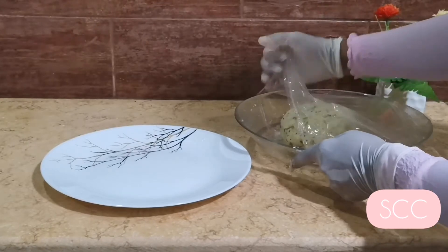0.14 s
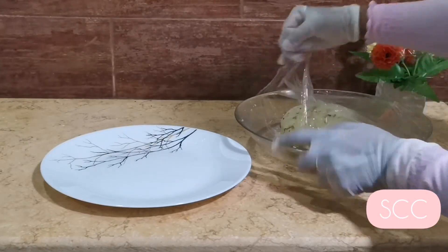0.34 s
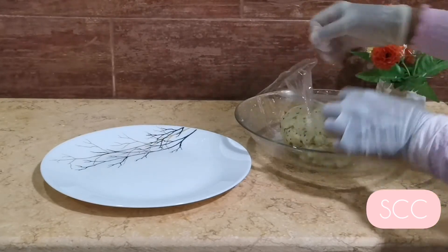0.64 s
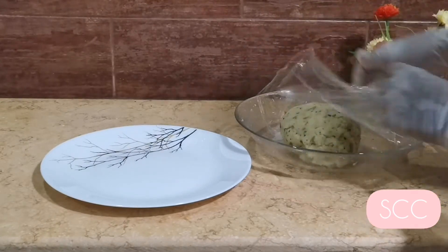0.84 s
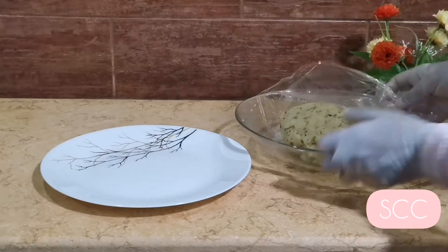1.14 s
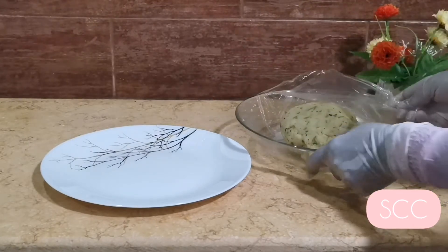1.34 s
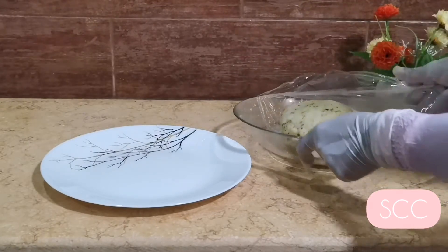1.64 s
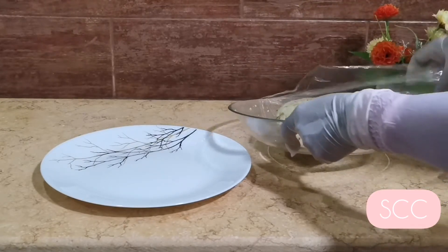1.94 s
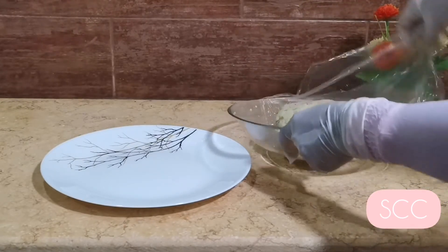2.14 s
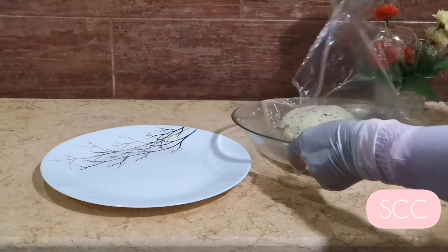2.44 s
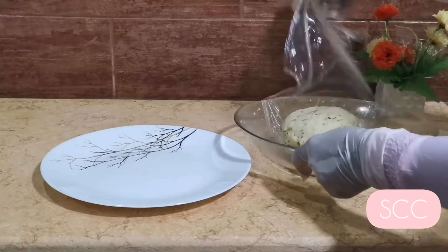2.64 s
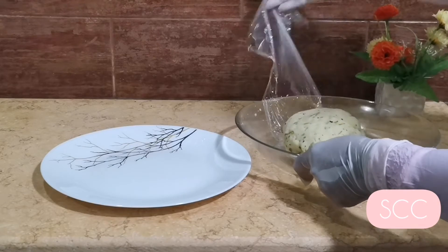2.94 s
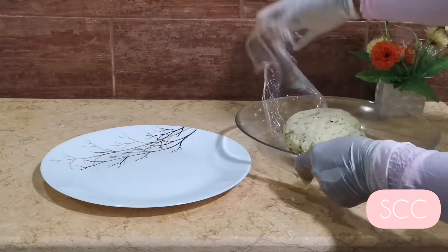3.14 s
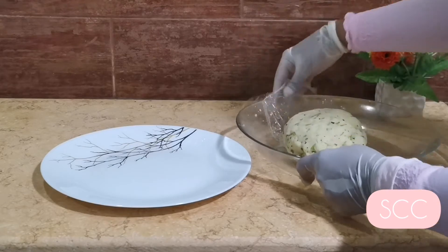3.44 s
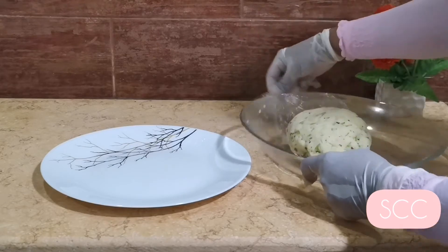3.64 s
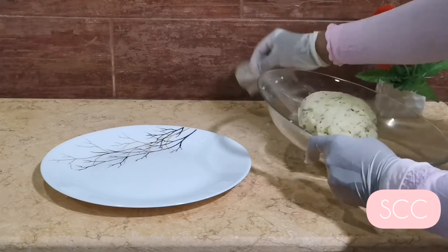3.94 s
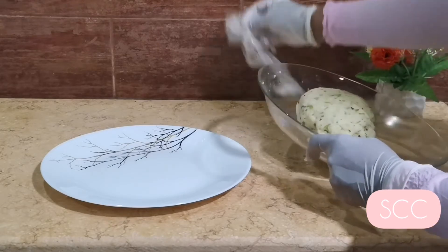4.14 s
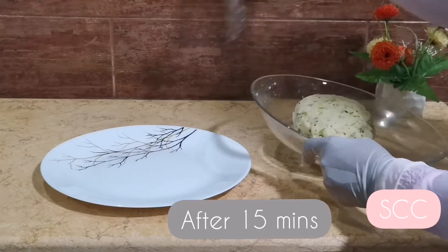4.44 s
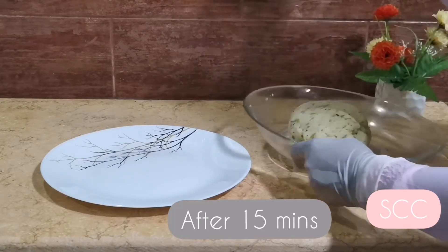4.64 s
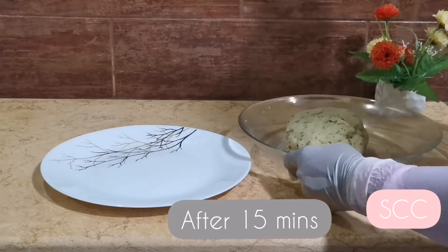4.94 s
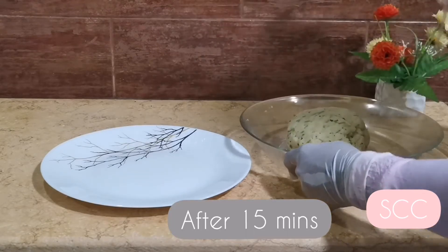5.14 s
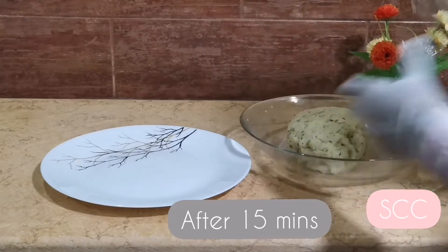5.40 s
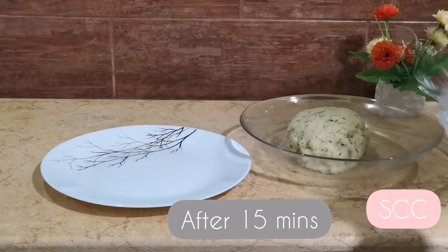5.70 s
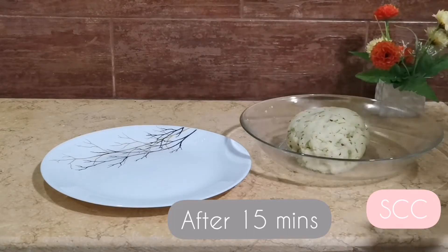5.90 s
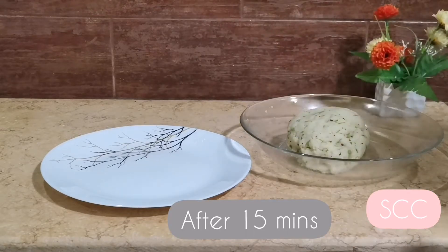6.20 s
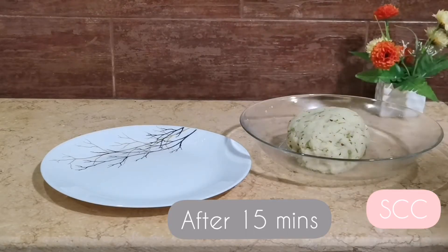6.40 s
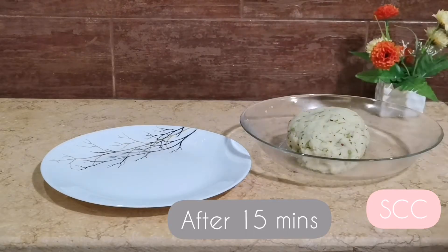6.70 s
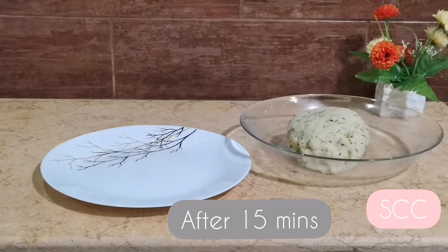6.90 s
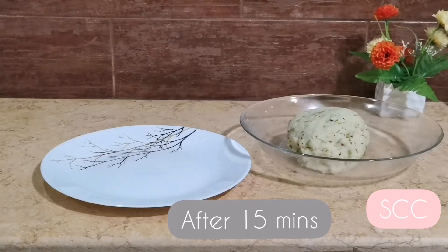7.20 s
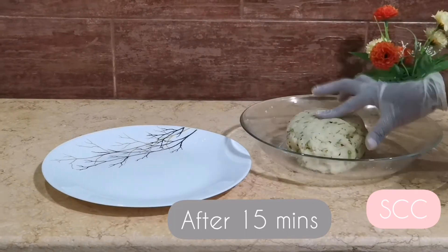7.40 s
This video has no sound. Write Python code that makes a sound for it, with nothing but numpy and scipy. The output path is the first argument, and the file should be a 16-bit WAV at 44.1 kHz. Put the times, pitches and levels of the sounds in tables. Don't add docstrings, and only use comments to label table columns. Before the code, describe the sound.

Gloved hands peel cling film from a glass bowl in a bare, echoing kitchen. Soft crinkles come in swells, with a dull glass knock early and a much louder clunk amid snaps before three seconds. The film is crumpled, the bowl slides briefly on stone and settles, then crinkles continue to one very sharp snap near the end. Close phone microphone, bright treble, faint hiss and hum.

```python
import sys
import numpy as np
from scipy import signal
from scipy.fft import rfft, irfft, next_fast_len
from scipy.io import wavfile
from scipy.ndimage import uniform_filter1d

SR = 44100
rng = np.random.default_rng(int(sys.argv[2]) if len(sys.argv) > 2 else 0)


def unload_wav(signal):
    wavfile.write(
        sys.argv[1],
        SR,
        np.round(np.clip(np.atleast_2d(signal).T, -1, 1) * 32767).astype(np.int16),
    )


def amplitude_ratio(level_db):
    exponent = np.asarray(level_db, float) / 20
    return 10 ** exponent


N = 333275

# peak_s, creases_db, rise_s, fall_s, rub_re_creases_db
FILM_SWELLS = [(.03, -65, 0.2874, 0.968, -5), (.125, -63, 0.02367, 0.1302, -3),
               (0.317, -57.5, 0.05885, 0.0985, -4.5), (0.598, -67, 0.0379, 0.00697, -3.5),
               (.702, -85, 0.031, 0.1604, -20.5), (.954, -59.5, 0.09743, 0.14294, -9.5),
               (1.084, -70, 0.01513, 0.0475, -4), (1.19, -70, 0.02126, 0.1046, 1.5),
               (1.285, -75.5, 0.1174, 0.04094, 7), (1.39, -83, .02, 0.2015, -13),
               (1.487, -60.5, 0.01206, 0.12536, 0.5), (1.629, -60.5, 0.25144, 0.0835, -7),
               (1.814, -65.5, 0.02486, 0.1486, 0), (1.948, -54, 0.0697, 0.2833, -9.5),
               (2.25, -60, 0.4687, 0.15, -6), (2.42, -59, 0.091, 0.07963, -6),
               (2.555, -65, 0.055, 0.0946, -9.5), (2.635, -42.5, 0.0022, 0.07157, -4.5),
               (2.81, -47.5, 0.13, 0.13882, -3.5), (2.932, -48.5, .004, 0.11383, -2.5),
               (3.063, -56, 0.12, 0.05035, -9), (3.225, -64.5, 0.14, 0.07267, -3),
               (3.527, -58.5, 0.0587, 0.04277, -13.5), (3.661, -52.5, 0.02508, 0.0693, -2),
             (3.692, -50, 0.03707, 0.02374, -12.5), (3.8, -57, 0.4174, 0.0554, -4),
             (3.94, -50, 0.21966, 0.1203, -3), (4.03, -45.5, 0.0036, 0.0692, -7.5),
             (4.088, -46.5, 0.12, 0.09848, -5.5), (5.05, -70, 0.716, 0.749, -8.5),
             (5.28, -69, 0.08, 0.1458, -3), (5.57, -64, 0.0988, .15, -8), (5.631, -52, 0.0159, 0.145, -15),
             (5.77, -51, 0.14275, 0.2558, -8), (5.908, -52.5, 0.01436, 0.4052, -7),
             (6.062, -59, 0.0064, 0.1063, 7.5), (6.119, -44.5, 0.02606, 0.05252, -4.5),
             (6.318, -52.5, 0.06206, 0.08617, -6), (6.45, -60, 0.1265, 0.4343, -7),
             (6.517, -55.5, 0.016, 0.04397, -4), (6.694, -52.5, 0.003062, 0.019, -24),
             (6.734, -59.5, 0.0317, 0.10916, -11.5), (6.928, -43, 0.002453, 0.06943, -19),
             (7.0, -60.5, 0.065, 0.315, -14), (7.139, -64.5, 0.014, 0.031, -6.5),
             (7.24, -74, 0.19, 0.39, 1)]
# time_s, left_right_db, tautness_db (airy top re creases), grip_db (bowl re rub)
HANDS = [(0, 2, -10, -9), (.6, 0, -5.5, -3), (1.0, -1, -4, -3), (1.45, -1, -9, -7.5), (1.65, -2.5, -4, 10),
         (2.0, -2, -4.5, -3), (2.4, -2, -5, -3.5), (2.64, -1.5, -7, -2), (2.8, -1, -5, 0),
         (3.1, -1.5, -6.5, -4.5), (3.6, -2.5, -5, -2.5), (4.05, -0.9663, -3.5, -13), (4.2, -1, -13.5, -7.5),
         (5.6, -1.5, -8.5, -7), (6.6, -4, -8.5, -11.5), (6.75, -5, 3.5, -29.5), (6.92, -4, -20, -26),
         (7.3, -1, -3, -10)]
# level_db of bowl-coloured rub, mid rub, creases, airy top
REST_DB = (-79.5, -81.5, -89, -90.5)
BAND_EDGES_HZ = [550, 1600, 4700, 9000, 15800]
# freq_hz, density_db_per_hz
CREASES = [(500, -7.5), (800, -6.5), (1140, -7.5), (1500, -8), (3100, -3.5), (4050, -7.5), (5200, -5),
           (6500, -4), (7200, 2.5), (8000, -6.5), (9300, -17.5), (13300, -23.5), (14900, -19.5),
           (16000, -29.5)]
# start_s, peak_db, centre_hz, room_share_db,
# left_right_db
SNAPS = [(1.082, -51, 7132, 5, -15.5), (1.4354, -51.5, 5682, -14, -1.5), (1.4778, -45, 7094, 1.5, 6.5),
         (1.485, -49, 5628, 1, -1), (1.811, -46.5, 6544, 1, -2.5), (1.8159, -50, 5759, 7, 0),
         (1.9048, -46.5, 7817, -2, -17.5), (2.2017, -41.5, 7083, 0.5, -1.5), (2.6267, -34, 5563, -2.5, -2),
         (2.6355, -26, 5975, -2, -6.5), (2.643, -29, 6939, -2.5, -10), (2.7696, -39.5, 5134, -3.5, -3),
         (2.9315, -38.5, 7291, 6, -5), (3.5064, -46, 7110, 2.5, -5.5), (3.5277, -43.5, 7131, -3, 1),
         (3.6301, -53, 6820, -7, 0.5), (3.6602, -43.5, 7335, -4.5, 4), (3.886, -41, 7149, 8, -0.5),
         (4.0305, -33, 6578, 6.5, -6.5), (5.3726, -44.5, 7330, 2, -3.5), (5.5608, -58, 7280, -6.5, -5),
         (5.6201, -47, 7350, -1, -17), (5.6316, -42, 7160, 2.5, -2), (5.7472, -43, 7185, -3.5, 0),
         (5.894, -52.5, 7090, -10, 6), (5.8311, -39, 7170, -10.5, 0), (5.908, -36.5, 7103, -17, 4.5),
         (6.0604, -43, 7089, 9, -3.5), (6.113, -33, 8210, -11, -3), (6.515, -46, 6900, -7, -7),
         (6.6812, -46.5, 7180, -4, -8.5), (6.693, -37.5, 6968, -5, -6.5), (6.8811, -45.5, 7050, -6.5, -4.5),
         (6.9237, -19, 6082, -2, -9.5), (7.13, -49, 7219, 3, -1),
         (2.5438, -51, 12900, 4.5, -9.5), (6.6952, -46.5, 11750, -4.5, -12),
         (6.7293, -37, 13400, -5.5, -15.5), (6.741, -34.5, 12010, -7, -11), (6.73, -46, 7400, -3.5, -9.5),
         (6.887, -56.5, 13500, -4.5, -5.5), (1.995, -42, 7810, 10.5, -1.5),
         (6.756, -52.5, 13000, -2, -12.5), (6.7685, -47, 11500, 2, -12.5), (6.9375, -46.5, 10000, -12, -12),
         (6.9318, -30, 6300, -13, -9.5), (6.9382, -31, 6000, -6, -6), (6.947, -38.5, 8100, -6, -6)]
# peak_s, level_db, fall_s, pitch_hz, sink_octaves
POCKETS = [(0.202, -72, 0.096, 907.3, 0.5945), (2.299, -67, 0.1329, 1035, 0.0412),
           (2.41, -70, 0.1205, 673, -0.09), (3.594, -68, 0.1141, 1135, -0.25),
           (3.679, -61, 0.0897, 990, 0.5516), (4.06, -52, 0.06404, 875.5, 0.657),
           (5.77, -72.5, 0.083, 1125, 0.19), (6.03, -68.5, 0.2262, 1120, 0.02),
           (1.25, -75.5, 0.0708, 2685, -0.0073), (6.123, -56, 0.0421, 871.2, .5)]
# time_s, pitch_hz, level_db
SQUEAK = [
    (5.2, 2940, -91),
    (5.268, 2900, -68.5),
    (5.298, 2900, -81),
    (5.308, 2900, -86),
    (5.33, 2920, -84),
]
# start_s, peak_db, centre_hz, contact_cut_hz, thud_db
KNOCKS = [(.308, -54, 561, 1190, -7), (1.447, -48, 818.5, 1444, -26), (1.453, -44.5, 912.7, 1395, -30.5),
          (1.4615, -32.5, 800.5, 2639, -54), (1.4668, -24, 860.8, 1753, -20), (1.478, -37, 2075, 2852, -41),
          (1.4745, -35.5, 962.2, 1627, -40), (1.801, -59, 1099, 2500, -21), (1.8105, -50, 1073, 2497, -8),
          (2.011, -55.5, 1294, 1663, -26), (2.054, -56, 1010, 1384, -29), (2.122, -52.5, 1016, 1808, -26),
          (2.274, -59.5, 982, 1405, -30), (2.316, -58, 573.4, 906.9, -23), (2.391, -55, 661.5, 1385, -18.5),
          (2.627, -45.5, 644.6, 990, -26.5), (2.6353, -39.5, 900.8, 2973, -25.5),
          (2.6364, -41, 777.3, 1298, -24), (2.644, -43.5, 902, 1497, -26.5),
          (2.6545, -34.5, 2200, 2807, -30.5), (2.6553, -15, 919.2, 2135, -19.5),
          (2.834, -42, 990, 1288, -31.5), (2.931, -47, 771.3, 2490, -8.5), (3.645, -43, 1099, 1564, -45.5),
          (4.007, -48, 948.5, 1530, -10.5), (4.035, -44.5, 1180, 1440, -34.5), (4.07, -63, 772.7, 970, -8),
          (4.965, -41.5, 1083, 1455, -4), (4.9689, -50.5, 1138, 2005, 4.5),
          (4.972, -48.5, 534, 845.4, -26.5), (5.831, -58.5, 879.5, 1294, -27),
          (5.995, -54, 1317, 2220, -37), (6.061, -56.5, 1039, 2500, -29), (6.075, -49.5, 1048, 2514, -21),
          (6.125, -59, 852.7, 1500, -13.5), (6.923, -61, 840, 1310, -23)]
# mode_hz, width_hz, level_db
COVERED_BOWL = [(228.97, 13, -16), (273, 22, 0), (533.99, 9, 2.5), (584, 15, -7.5), (732.89, 15, 1.5),
                (808.28, 17, 4), (880, 34, -6.5), (930, 5.9, -10.5), (1010, 16, -1), (1143.7, 18, 1),
                (1348, 22, -13), (1840, 20.83, -8.5), (2216.1, 18, -13), (2730, 69.8, -3.5)]
# mode_hz, width_hz, level_db
OPEN_BOWL = [(201.7, 23, -10.5), (301.49, 32, 0.5), (523.6, 10, 1.5), (580, 14, -13.5), (685.36, 13, -4),
             (740.5, 6.1, 1), (859.71, 15, -4.5), (891.51, 12, -7.5), (936.19, 11, -4.5), (990, 5.3, 2),
             (1072.4, 14, -5.5), (1190, 39, 0), (1263.8, 9.2, -3.5), (1712.9, 12, -15.5)]
# freq_hz, density_db_per_hz
DRAG = [(350, -34.5), (600, -15.5), (834, -6.5), (1290, -8.5), (1530, -14.5), (2070, -13), (2680, -17),
        (3300, -8.5), (4050, -18), (5260, -3.5), (6550, 0), (7110, 1), (10300, -16), (14900, -21.5),
        (16000, -35.5)]
# delay_s, level_db
ECHOES = [(.0045, -14), (.008, -8), (.0145, -7), (.0183, -14), (.023, -11), (.0355, -12)]
# freq_hz, t60_s
KITCHEN_T60 = [(150, 0.48), (500, 0.42), (850, 0.35), (1300, 0.34), (3000, 0.42), (6000, 0.46),
               (12000, 0.35)]
# freq_hz, likeness_0_to_1
LIKENESS = [(30, 0.38), (80, 0.5), (150, 0.65), (330, 0.66), (700, 0.35), (1500, 0.043), (5000, 0.013)]
# peak_s, level_db, rise_s, fall_s
JOLTS = [(.65, -94.5, 0.175, 0.133), (2.24, -76, 0.03045, 0.0951), (2.4, -71.5, 0.0837, 0.1157),
         (2.789, -53, 0.07675, 0.11643), (3.599, -81.5, 0.275, 0.1055), (4.498, -78, 0.1, 0.273),
         (5.08, -77, 0.1, 0.288), (7.2, -96, 0.03272, 0.24)]
# peak_s, level_db, rise_s, fall_s
BOOMS = [(.05, -70, 0.0884, 0.1705), (1.049, -75, 0.1884, 0.2835), (3.35, -65.5, 0.1973, 0.2582),
         (4.45, -67, 0.2221, 0.15), (5.05, -64.5, 0.1675, 0.1328), (7.3, -67, 0.1445, 0.19)]
# freq_hz, density_db_per_hz
AIR = [(12, -17), (20, 3.5), (182, -2.5), (328, -4.5), (527, -0.5), (607, 0), (718, 0.5), (1400, -23),
       (2990, -14), (3950, -23), (6360, -17.5), (7110, -10), (9140, -27.5), (14700, -22.5), (16000, -33.5)]
# mode_hz, width_hz, rms_db
RATTLE = [(173.7, 6.3, -79.5), (195.2, 20, -89.5)]
MAINS_DB = (-75, -74, -83, -78.5, -81.5)

SWELL_DB, SWELL_BEND = 13.5, 1.1726
SNAP_OCTAVES = 0.38
POCKET_WIDTH_HZ, POCKET_RISE_SHARE, POCKET_OPENING_S = 110, 0.5318, 0.0402
UNCOVER_S, SET_DOWN_S = 2.5, 4.5
BOWL_SIDE_DB = -1.5
GRIP_DAMPING = 2.868
SLIDE_START_S, SLIDE_ATTACK_S, SLIDE_END_S, SLIDE_RELEASE_S = 4.5, 0.078, 4.89, 0.04316
SLIDE_DB, SLIDE_SAG_DB_PER_S, SLIDE_SIDE_DB = -51, 25.5, 2.5
SKIM_S, SKIM_DB = 4.44, -55.5
LAG_S_PER_DB = 4e-5
TAIL_HOLD_S, TAIL_DROP_S, TAIL_DROP_DB = 0.25, .025, 6.5
AIR_DB = -70.5
RUMBLE_DB, DEEP_DB, RUMBLE_SWING_DB, DEEP_SWING_DB = -71.5, -71, 1.1, 1.2
MAINS_HZ, MAINS_WAVER_DB = 58.79, 3.5
END_S = 7.2859


def swell(s, db, rise_s, fall_s):
    late = np.arange(N) / SR - s
    steps = np.where(late < 0, -late / max(rise_s, .001), late / max(fall_s, .001))
    return amplitude_ratio(db - SWELL_DB * steps ** SWELL_BEND) ** 2


def gestures():
    _, taut_db, grip_db = in_time(HANDS)
    bright = rub = 0
    for *shape, rub_db in FILM_SWELLS:
        power = swell(*shape)
        bright = bright + power
        rub = rub + power * amplitude_ratio(rub_db) ** 2
    layers = (rub * amplitude_ratio(grip_db) ** 2, rub, bright, bright * amplitude_ratio(taut_db) ** 2)
    return [np.sqrt(power + amplitude_ratio(db) ** 2) for power, db in zip(layers, REST_DB)]


def rustle(gains, per_s=3500, spread_db=1.1795, blur=0.85, flutter_db=0.7253):
    sizes = amplitude_ratio(spread_db * np.minimum(rng.exponential(1, (2, N)), 5)) * rng.choice([-1, 1], (2, N))
    creases = rms_one(sizes * (rng.random((2, N)) < per_s / SR))
    creases = creases + blur * rng.standard_normal((2, N))
    film = stereo(*creases, CREASES)
    together = drift(45)
    out = np.zeros((2, N))
    for low_hz, high_hz, gain in zip(BAND_EDGES_HZ, BAND_EDGES_HZ[1:], gains):
        flutter = amplitude_ratio(flutter_db * (together + 0.72 * drift(40)))
        out += rms_one(band(film, low_hz, high_hz, order=5)) * gain * flutter
    return out * sides(in_time(HANDS)[0]) * amplitude_ratio(0.5)


def snap(hz, octaves):
    click = np.eye(1, 512, 30)[0]
    octaves = np.clip(octaves, .2, 2.5)
    half = 2 ** (octaves / 2)
    crack = band(click, hz / half, min(hz * half, 15600), order=4)
    crack = crack + amplitude_ratio(-13.5) * band(click, 2930, 3400)
    crack = crack + amplitude_ratio(-23.0) * band(click, 3400, 4600)
    crack = crack + amplitude_ratio(-28.5) * band(click, 8000, 14500, order=4)
    return crack + 0.43 * resonate(crack, 7150, 797)


def crackle(bright, per_s=70, spread_db=3.0, over_db=14):
    handled = bright * ((np.arange(N) < 6.6 * SR) | (np.arange(N) > 7.1 * SR))
    sizes = amplitude_ratio(spread_db * np.minimum(rng.exponential(1, N), 3)) * rng.choice([-1, 1], N)
    clicks = sizes * (rng.random(N) < per_s / SR) * handled * amplitude_ratio(over_db)
    return signal.oaconvolve(clicks, snap(6160, 1.5))[:N] * sides(in_time(HANDS)[0])


def pockets():
    t, out = np.arange(N) / SR, np.zeros((2, N))
    breath = rng.standard_normal((2, N)) + 1j * rng.standard_normal((2, N))
    lowpass = signal.butter(2, POCKET_WIDTH_HZ, fs=SR, output="sos")
    breath = signal.sosfilt(lowpass, breath + 0.8 * breath[::-1])
    for s, db, fall_s, hz, sink in POCKETS:
        octaves = -sink / 2 * np.tanh((t - s) / POCKET_OPENING_S)
        hollow = np.real(breath * np.exp(2j * np.pi * np.cumsum(hz * 2 ** octaves) / SR))
        out += rms_one(hollow) * np.sqrt(swell(s, db, POCKET_RISE_SHARE * fall_s, fall_s))
    return out


def squeak():
    s, hz, db = np.transpose(SQUEAK)
    t = np.arange(N) / SR
    tone = np.sin(2 * np.pi * np.cumsum(np.interp(t, s, hz) + 25 * drift(50)) / SR)
    return tone * amplitude_ratio(np.interp(t, s, db, left=-120, right=-120) + 1 + 3 * drift(50))


def knock(hz, cut_hz, thud_db, bowl):
    click = np.eye(1, 16384)[0]
    lowpass = signal.butter(6, np.clip(cut_hz, 300, 9000), fs=SR, output="sos")
    contact = signal.sosfilt(lowpass, click)
    body = band(contact, hz / 1.2165, hz * 1.4) + amplitude_ratio(-8) * band(contact, 710, 3200)
    modes = 0
    for k, (mode_hz, width_hz, db) in enumerate(bowl):
        gain = amplitude_ratio(db - 6.585 * abs(np.log2(mode_hz / hz)))
        modes = modes + gain * (-1) ** k * resonate(contact, mode_hz, width_hz)
    body = body + 3.4823 * modes
    thud = band(contact, 140, 404)
    return body / np.abs(body).max() + amplitude_ratio(thud_db) * thud / np.abs(thud).max()


def bowl_knocks():
    held = [(hz, width * GRIP_DAMPING, db) for hz, width, db in OPEN_BOWL]
    events = []
    for row in KNOCKS:
        bowl = COVERED_BOWL if row[0] < UNCOVER_S else OPEN_BOWL if row[0] < SET_DOWN_S else held
        events.append((*row, bowl, BOWL_SIDE_DB))
    return place(events, knock)


def slide():
    t = np.arange(N) / SR
    sag_db = SLIDE_SAG_DB_PER_S * np.clip(t - SLIDE_START_S - .1, 0, None)
    stop_db = 12 * np.clip(t - SLIDE_END_S, 0, None) / SLIDE_RELEASE_S
    gain = np.sqrt(swell(SLIDE_START_S, SLIDE_DB, SLIDE_ATTACK_S, fall_s=1e3))
    hiss = stereo(*rng.standard_normal((2, N)), DRAG)
    hiss = hiss - 1.0983 * resonate(hiss, 6460, 360)
    skim = np.sqrt(swell(SKIM_S, SKIM_DB, 0.0805, 0.0704)) * band(hiss[::-1], 4560, 12700)
    friction = (hiss * gain + skim) / np.std(band(hiss, 4152, 10570))
    return friction * amplitude_ratio(0.54 * drift(25) - sag_db - stop_db) * sides(SLIDE_SIDE_DB)[:, None]


def kitchen(x, tail_db, echo_db):
    t = np.arange(SR // 2) / SR
    noise = stereo(*rng.standard_normal((2, len(t))), [(20, 0), (20000, 0)])
    tail = 0
    for hz in 110 * 2 ** np.arange(0, 7.1, .5):
        decay = amplitude_ratio(-60 * t / at_hz(KITCHEN_T60, hz))
        tail = tail + band(noise, hz / 2 ** .25, hz * 2 ** .25) * decay
    tail = tail * amplitude_ratio(-TAIL_DROP_DB * np.clip((t - TAIL_HOLD_S) / TAIL_DROP_S, 0, 1))
    reply = amplitude_ratio(tail_db) * tail * np.minimum(t / 0.0016, 1)
    for s, db in ECHOES:
        lags = ((s + rng.uniform(0, 5e-5, 2)) * SR).astype(int)
        reply[[0, 1], lags] += amplitude_ratio(db + echo_db) * rng.choice([-1, 1])
    return signal.oaconvolve(x, reply, axes=1)[:, :N]


def rumble(noise):
    shake = np.sqrt(sum(swell(*row) for row in JOLTS))
    booms = np.sqrt(sum(swell(*row) for row in BOOMS))
    low = amplitude_ratio(RUMBLE_DB + RUMBLE_SWING_DB * drift(5.3)) + shake
    deep = amplitude_ratio(DEEP_DB + DEEP_SWING_DB * drift(5.8)) + amplitude_ratio(-9.0) * shake + booms
    return amplitude_ratio(3) * low * rms_one(band(noise, 135, 550)) + deep * rms_one(band(noise, 20, 180))


def mains():
    turns = 2 * np.pi * np.cumsum(MAINS_HZ + 0.27 * drift(1.6)) / SR
    hum = 0
    for k, db in enumerate(MAINS_DB, 1):
        gain = amplitude_ratio(db - 1 + MAINS_WAVER_DB * drift(7.3))
        hum = hum + gain * np.sin(k * turns + rng.uniform(0, 2 * np.pi))
    return hum


def air():
    noise = stereo(*rng.standard_normal((2, N)), AIR)
    hiss = amplitude_ratio(AIR_DB) * rms_one(band(noise, 610, 17000))
    rattle = sum(amplitude_ratio(db) * rms_one(resonate(noise, hz, width)) for hz, width, db in RATTLE)
    return hiss + rumble(noise) + mains() + rattle


def rms_one(x):
    return x / np.sqrt(np.mean(x ** 2) + 1e-30)


def at_hz(points, hz):
    table_hz, values = np.transpose(points)
    return np.interp(np.log(hz + 1), np.log(table_hz), values)


def in_time(rows):
    s, *columns = np.transpose(rows)
    return [np.interp(np.arange(N) / SR, s, c) for c in columns]


def band(x, low_hz, high_hz, order=2):
    edges = [max(low_hz, 20), min(high_hz, .45 * SR)]
    return signal.sosfilt(signal.butter(order, edges, "band", fs=SR, output="sos"), x)


def resonate(x, hz, width_hz):
    r = np.exp(-np.pi * width_hz / SR)
    zeros = np.array([1, 0, -1]) * (1 - r * r) / 2
    poles = [1, -2 * r * np.cos(2 * np.pi * hz / SR), r * r]
    return signal.lfilter(zeros, poles, x)


def drift(rate_hz):
    knots = rng.standard_normal(400)
    return rms_one(np.interp(np.arange(N) / SR * rate_hz, np.arange(400), knots))


def stereo(mid, side, spectrum):
    size = next_fast_len(len(mid))
    hz = np.arange(size // 2 + 1) * SR / size
    alike = np.clip(at_hz(LIKENESS, hz), 0, 1)
    pair = np.sqrt(1 + alike) * rfft(mid, size) + np.sqrt(1 - alike) * rfft(side, size) * [[1], [-1]]
    return irfft(pair * amplitude_ratio(at_hz(spectrum, hz)), size)[:, :len(mid)]


def sides(pan_db):
    return amplitude_ratio(np.array([pan_db / 2, -pan_db / 2]))


def place(events, pulse):
    out = np.zeros((2, N))
    for s, db, *colour, pan_db in events:
        shape = pulse(*colour)
        for ear, gain, late_db in zip(out, sides(pan_db), (-pan_db, pan_db)):
            at = round((s + max(late_db, 0) * LAG_S_PER_DB) * SR)
            ear[at:at + len(shape)] += gain * amplitude_ratio(db) * shape / np.abs(shape).max()
    return out


def scene():
    gains = gestures()
    flips = SNAPS
    snaps = place([(s, db, hz, SNAP_OCTAVES, pan) for s, db, hz, wet, pan in flips], snap)
    sent = place([(s, db + wet, hz, SNAP_OCTAVES, pan / 2) for s, db, hz, wet, pan in flips], snap)
    folds = crackle(gains[2])
    film = rustle(gains) + snaps + folds + pockets() + squeak()
    knocks = bowl_knocks()
    moved = np.arange(N) > SET_DOWN_S * SR
    room = kitchen(sent + folds, tail_db=-25.0, echo_db=-1.0)
    room = room + kitchen(knocks * ~moved, tail_db=-23.5, echo_db=-4)
    room = room + kitchen(knocks * moved, tail_db=-21, echo_db=-7.5)
    return film + knocks + slide() + room + air() * sides(-0.6)[:, None]


def denoise(x, depth=.15):
    cells = signal.stft(x, nperseg=1024)[2]
    power = uniform_filter1d(np.abs(cells) ** 2, size=2, axis=2) + 1e-24
    around = uniform_filter1d(power, size=24, axis=1)
    return signal.istft(cells * np.minimum(power / around, 3) ** depth, nperseg=1024)[1][:, :N]


def band_limit(x):
    return signal.sosfilt(signal.butter(12, 15800, fs=SR, output="sos"), x)


def record(dry):
    heard = dry - 0.24 * resonate(dry, 4000, 950)
    gate = np.clip((END_S - np.arange(N) / SR) / 0.0004, 0, 1)
    return band_limit(denoise(heard, depth=.06) * gate)


dry = scene()
out = record(dry)
unload_wav(out)
```